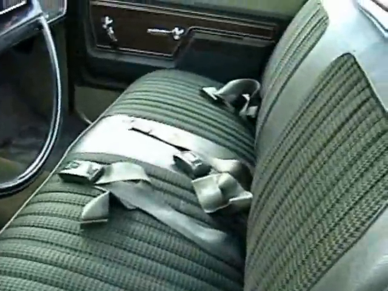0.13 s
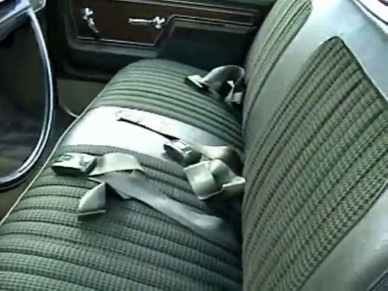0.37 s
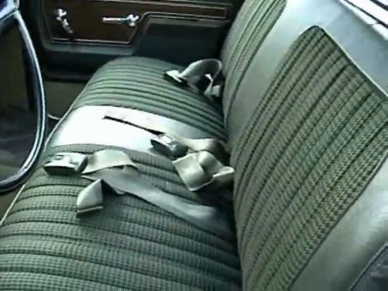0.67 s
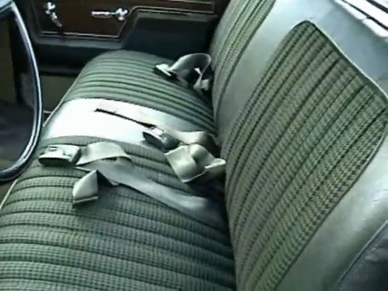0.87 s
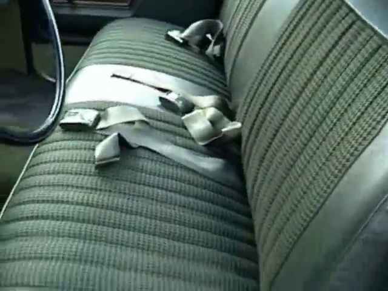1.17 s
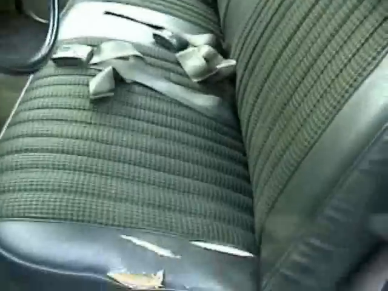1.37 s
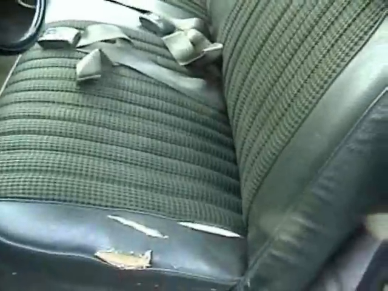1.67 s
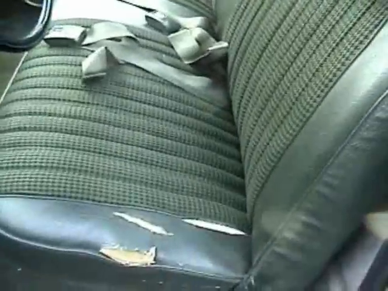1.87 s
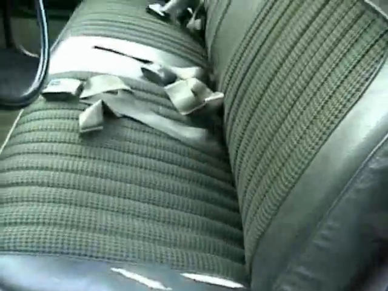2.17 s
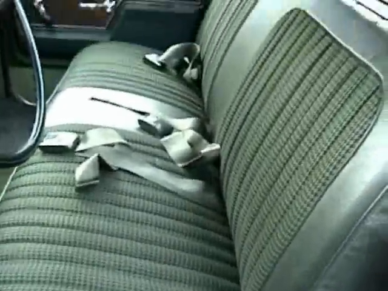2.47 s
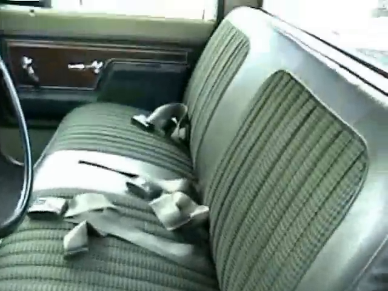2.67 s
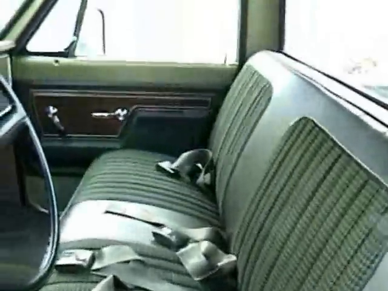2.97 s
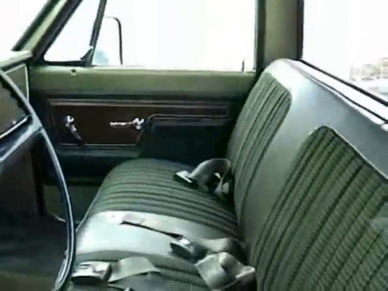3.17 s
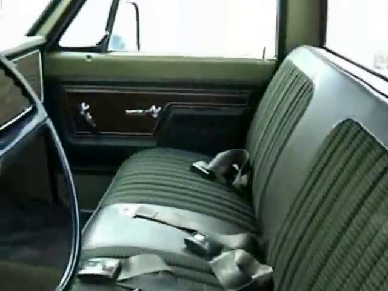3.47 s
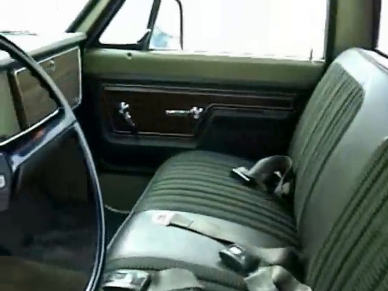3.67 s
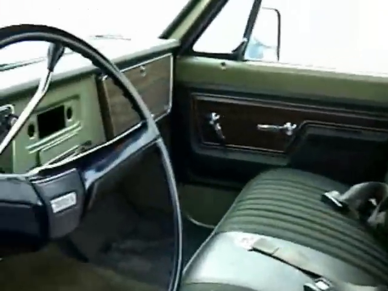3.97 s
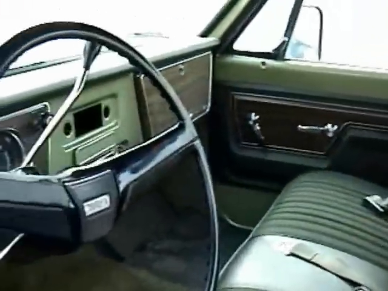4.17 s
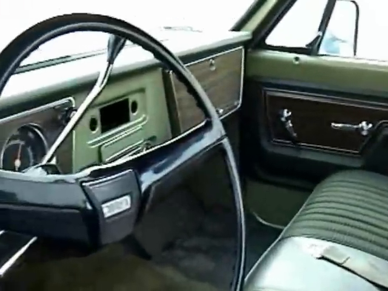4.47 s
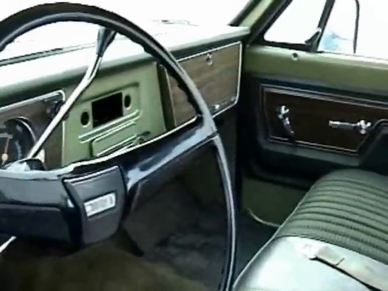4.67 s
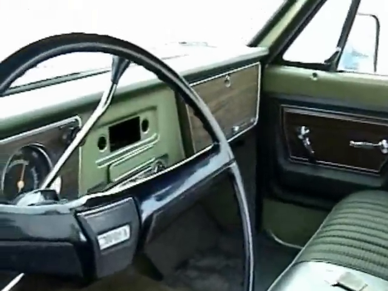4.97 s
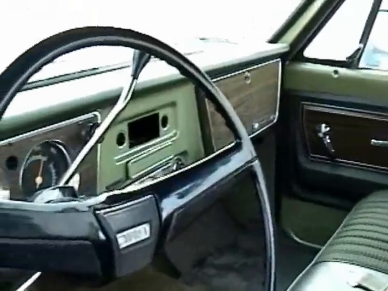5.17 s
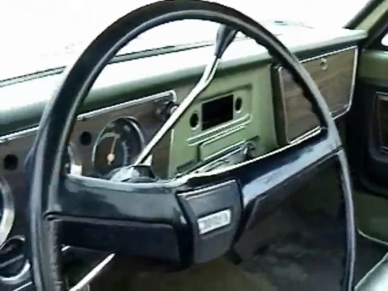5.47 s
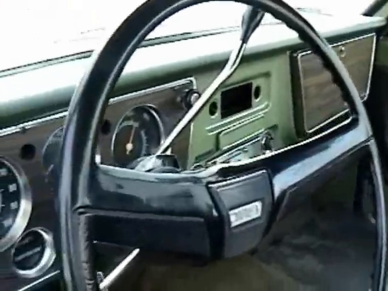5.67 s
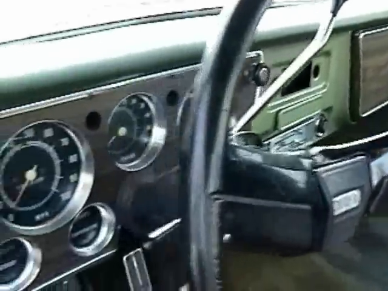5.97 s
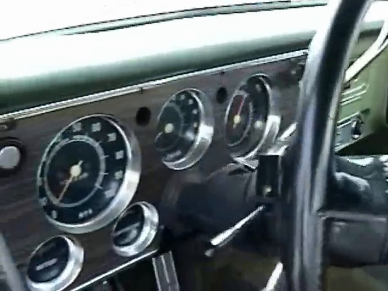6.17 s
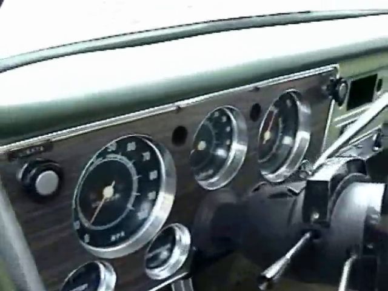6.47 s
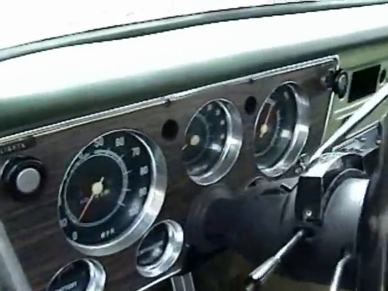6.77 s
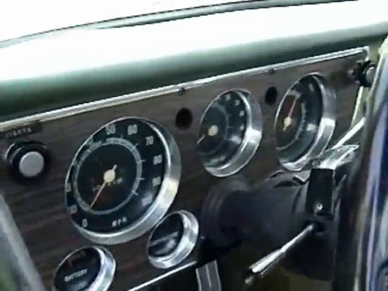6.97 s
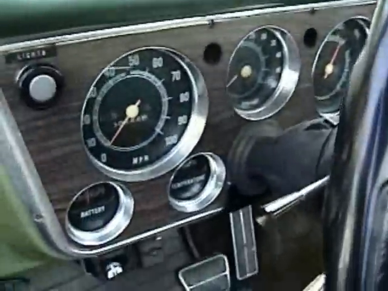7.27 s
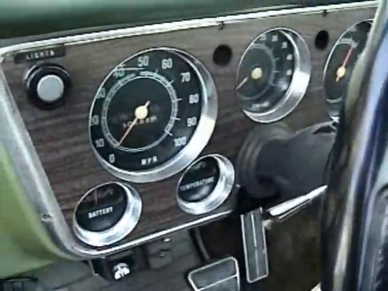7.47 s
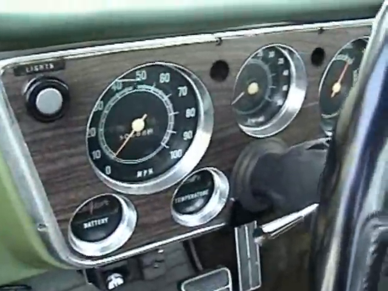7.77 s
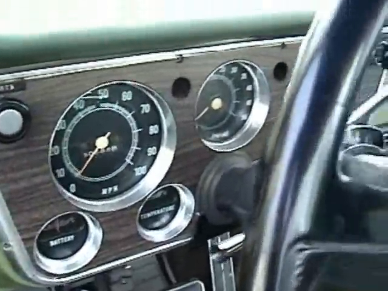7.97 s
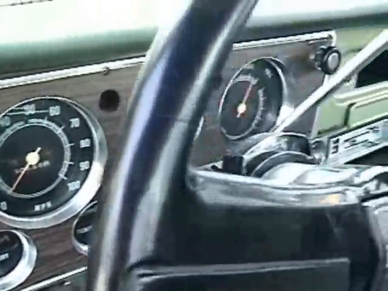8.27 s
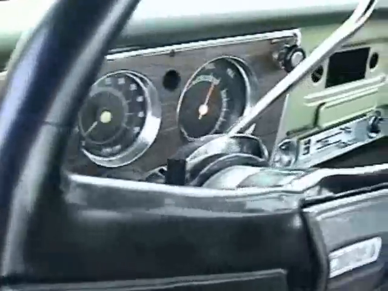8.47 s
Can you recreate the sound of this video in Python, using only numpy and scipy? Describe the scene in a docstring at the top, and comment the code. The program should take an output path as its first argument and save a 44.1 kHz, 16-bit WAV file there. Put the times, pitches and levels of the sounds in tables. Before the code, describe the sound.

Someone shifts about in an old truck cab, with scattered knocks, clicks and rubs, one sharp metallic latch snap midway, and a heavier thump later.

```python
"""Someone with a small camera leans in at the open door of a parked pickup and climbs into the cab.
Shaped noise makes faint outdoor air, rustle and rubs; wavering tones make the camera drive's whine.
Bumps, soft thumps and hollow knocks soon join: damped blows with ringing and a brief answer from the cab.
Latch clicks, bright ticks and a faint swish of fabric follow; far traffic swells early, the drive's whirr later.
The door latch snaps loudest just before four seconds; near the end a low drone comes in and grows."""
import sys
import numpy as np
from scipy import signal
from scipy.fft import rfft, irfft
from scipy.io import wavfile
from scipy.ndimage import uniform_filter1d

SR = 44100
rng = np.random.default_rng(int(sys.argv[2]) if len(sys.argv) > 2 else 0)


def output_pcm(signal):
    """Save a mono or channel-first signal as 16-bit PCM at the path in sys.argv[1].

    Samples are clipped to [-1, 1] before scaling.
    """
    pcm = np.clip(np.atleast_2d(signal).T, -1, 1) * 32767
    wavfile.write(sys.argv[1], SR, np.round(pcm).astype(np.int16))


N = 380128
TIME = np.arange(N) / SR
FREQS = np.fft.rfftfreq(4096, 1 / SR) + 1  # the 1 Hz shift keeps logarithms finite

# In every table of contacts, resonance is the main one of the spot that is hit; hardness adds treble.
# ringing of the door's metal: (frequency [Hz], relative level [dB], time to fade by 60 dB [s])
DOOR_RINGING = [(960, -17.5, .14), (1177, -7, 0.13), (1295, -2.5, 0.08), (1410, -1, .11), (1590, -1.5, .12),
                (1630, -6.5, .11), (1793, -9, 0.12), (1980, 0.5, 0.13), (2240, -13.5, .12),
                (2310, -11, .11), (2560, -13.5, .1), (2430, 4, .1), (2750, 11, 0.086)]
# ringing of hollow panels: (frequency [Hz], relative level [dB], time to fade by 60 dB [s])
PANEL_RINGING = [(175, -5, .1), (298, 16.5, 0.022), (450, -26, 0.048), (634, -11.5, 0.086),
                 (742, 1.5, 0.046), (870, 6, 0.033), (1250, -6.5, .06)]
# course of the rustle as the body moves, before overall trims:
# (time [s], middle band level [dB], hiss level [dB])
RUSTLE_LEVELS = [(0.0, -49.5, -56), (0.58, -50, -59.5), (0.81, -53, -61.5), (1.34, -50, -62.5),
                 (1.9, -54.5, -64.5), (2.98, -56, -66.5), (3.55, -52.5, -62), (3.79, -48.5, -61.5),
                 (3.96, -48.5, -59.5), (4.1, -54, -62.5), (4.37, -57, -65.5), (5.02, -54.5, -63),
                 (6.39, -56.5, -63.5), (6.53, -53.5, -61.5), (6.96, -52, -65), (7.42, -58, -65),
                 (8.04, -57.5, -65), (8.62, -52, -66.5)]


def undb(db):
    """Turn decibels into gain."""
    return 10 ** (np.asarray(db) / 20)


def unit(x):
    """Scale to an average strength (rms) of 1."""
    return x / np.sqrt(np.mean(x ** 2) + 1e-20)


def fade(t, t60):
    """Exponential decay that drops 60 dB in t60 seconds."""
    return np.exp(-np.log(1000) * t / t60)


def curve(rows, t, axis=1):
    """Read one column of a level curve at time t."""
    columns = np.transpose(rows)
    return np.interp(t, columns[0], columns[axis])


def swell(peak_s, width_s):
    """Gain of something that grows, peaks and fades."""
    return 1 / (1 + ((TIME - peak_s) / width_s) ** 2)


def walk(rate):
    """Smooth chance: straight lines between random values, rate per second, spread near 1."""
    k = int(SR / rate)
    steps = np.repeat(rng.standard_normal(N // k + 1), k)
    return 1.158 * uniform_filter1d(steps, k)[:N]


def add(out, s, x):
    """Mix a stereo sound in at time s."""
    start = max(0, int(s * SR))
    out[:, start:start + x.shape[1]] += x[:, :N - start]


def place(x, pan_db, lag_s=0):
    """Lean a stereo sound to one side (positive is left); the left port hears it lag_s later."""
    samples = np.arange(x.shape[1])
    left = np.interp(samples - lag_s * SR, samples, x[0], left=0)
    return np.array([left, x[1]]) * unit(undb([[pan_db / 2], [-pan_db / 2]]))


def pair(count, likeness):
    """Left and right noise with a given correlation, at most 0.99."""
    mid, side = rng.standard_normal((2, count))
    c = np.clip(likeness, 0, .99)
    return np.sqrt((1 + c) / 2) * mid + np.sqrt((1 - c) / 2) * np.array([side, -side])


def hump(f, hz, octaves):
    """Power of a broad resonance."""
    return np.exp(-.5 * (np.log2(f / hz) / octaves) ** 2)


def response(power):
    """Impulse response with this power spectrum, starting at once (minimum phase), with energy 1."""
    cepstrum = irfft(np.log(power / power.max() + 1e-7) / 2)
    # fold the mirrored half forward so that nothing sounds before the impulse
    cepstrum[1:len(power) - 1] *= 2
    cepstrum[len(power):] = 0
    h = irfft(np.exp(rfft(cepstrum)))[:len(power)]
    return h / np.linalg.norm(h)


def through(x, h):
    """Filter both channels."""
    return signal.fftconvolve(x, h[None], axes=1)


def band(hz, octaves, likeness):
    """Narrow stereo noise, rms 1."""
    noise = through(pair(N, likeness), response(hump(FREQS, hz, octaves)))
    return unit(noise[:, :N])


def tone(hz, waver_hz, waver_db):
    """A single tone that wavers slightly in pitch and level."""
    phase = 2 * np.pi * np.cumsum(hz + waver_hz * walk(14)) / SR
    return np.sqrt(2) * np.sin(phase) * undb(waver_db * walk(5.7))


def colour(hz, hard_db, thud_db, clack_db, tick_db):
    """A contact's damped main resonance and thud, with a clack and tick that grow with hardness."""
    # peaks and dips of the cab and camera housing: (frequency [Hz], width [Hz], level [dB])
    housing = [(322, 11, 9.5), (473, 22, 3.5), (598, 82, 6), (800, 150, -4), (940, 40, 2.5), (1243, 120, 3),
               (1408, 36, -7), (1600, 95, 2), (1860, 140, 4), (2180, 550, -1), (2640, 520, -1.5),
               (3530, 280, -1)]
    thud = undb(thud_db) ** 2 * hump(FREQS, 573, 0.75)
    clack = undb(clack_db + hard_db) ** 2 * hump(FREQS, 2400, .23)
    tick = undb(tick_db + hard_db) ** 2 * hump(FREQS, 4190, 0.5)
    housing_db = sum(db / (1 + (2 * (FREQS - f) / width) ** 2) for f, width, db in housing)
    return response((hump(FREQS, hz, 0.29) + thud + clack + tick) * undb(housing_db) ** 2)


def blows(table, modes, thud_db, clack_db, tick_db, ring_db, scatter_db, scatter_t60, cab_db, cab_t60,
          rebound_s, rebound, likeness, lag_s, arrive_s):
    """Each blow is a push and a rebound, with near reflections, ringing modes and the cab's short tail."""
    out, t = np.zeros((2, N)), np.arange(int(.3 * SR)) / SR
    for s, db, hz, hard_db, pan_db in table:
        h = colour(hz, hard_db, thud_db, clack_db, tick_db)
        push = np.zeros((2, len(t)))
        push[:, 0] = 1
        # a sound from the side reaches the far port by a longer way round
        delays = (rebound_s * rng.uniform(0.78, 1.4) + np.array([lag_s, 0])) * SR
        push[[0, 1], delays.astype(int)] += rebound
        ring = np.zeros((2, len(t)))
        for f, mode_db, t60 in modes:
            detune = 1 + .005 * rng.standard_normal()
            phase = 0.5 * rng.standard_normal((2, 1))
            ring += undb(mode_db) * fade(t, t60) * np.sin(2 * np.pi * f * detune * t + phase)
        arrive = 1 - np.exp(-(t / arrive_s) ** 2)  # reflections need a moment to come back
        scatter = pair(len(t), likeness) * arrive * fade(t, scatter_t60)
        cab = pair(len(t), likeness / 2) * arrive * fade(t, cab_t60)
        parts = (push, 0), (ring, ring_db), (scatter, scatter_db), (cab, cab_db)
        hit = sum(undb(part_db) * unit(through(part, h)) for part, part_db in parts)
        hit /= np.sqrt(np.mean(hit[:, :SR // 100] ** 2))  # the first 10 ms set the level
        add(out, s, undb(db) * place(hit, pan_db, lag_s))
    return out


def air(body_db, hiss_db, low_db, flicker_db):
    """Outdoor rumble, a wavering middle band of air and rustle, and smooth hiss."""
    # tone of the air within each band: (frequency [Hz], relative level per Hz [dB])
    air_shape = [(15, -55), (25, -13), (54, -8), (81, -3.5), (114, -8), (179, -5.5), (257, -8), (378, -11),
                 (447, -8.5), (964, -11.5), (1800, -17), (2240, -20), (3060, -16.5), (6590, -17.5),
                 (7800, -25), (10100, -86.5), (17200, -120)]
    # how alike left and right are: (frequency [Hz], correlation [0 to 1])
    air_match = [(30, .4), (80, 0.84), (200, 0.57), (600, 0.31), (1500, 0.069), (3000, 0.061),
                 (7000, 0.052)]
    # course of the outdoor rumble, before low_db: (time [s], level [dB])
    rumble_levels = [(0.0, -57), (1.3, -62.5), (5.93, -63.5), (6.24, -66), (8.62, -65.5)]
    f = np.fft.rfftfreq(N, 1 / SR) + 1

    def over_pitch(rows):
        hz, values = np.transpose(rows)
        return np.interp(np.log(f), np.log(hz), values)

    c = np.clip(over_pitch(air_match), 0, 1)
    mid, side = rfft(rng.standard_normal((2, N))) * undb(over_pitch(air_shape))
    both = mid + np.sqrt((1 - c) / (1 + c)) * np.array([side, -side])
    low = 1 / (1 + (f / 190) ** 6)
    high = 1 / (1 + (2900 / f) ** 6)
    rumble, body, hiss = (unit(irfft(both * part, N)) for part in (low, 1 - low - high, high))
    rumble *= undb(low_db + curve(rumble_levels, TIME) + 1.2 * walk(5))
    body *= undb(body_db + curve(RUSTLE_LEVELS, TIME) + flicker_db * walk(45))
    hiss *= undb(hiss_db + curve(RUSTLE_LEVELS, TIME, axis=2))
    return rumble + body + hiss


def drive_whine(trim_db):
    """Thin whine of the camera's drive: lines that waver separately left and right."""
    # lines of the whine: (frequency [Hz], level before trim_db [dB])
    lines = [(2370, -78.5), (2529, -78), (2686, -78), (3160, -79), (3494, -79), (3634, -82), (3765, -80),
             (6186, -89.5), (6374, -86)]
    return sum(undb(db + trim_db) * np.array([tone(hz, 3, 1.6), tone(hz, 3, 1.6)]) for hz, db in lines)


def low_hum(level_db):
    """A low, slightly unsteady hum, the same on both sides."""
    return undb(level_db) * tone(87, 2.86, 0.9)


def far_traffic(peak_s, width_s, peak_db):
    """Far traffic: a narrow low band of noise that swells and fades."""
    return band(262, 0.072, likeness=1.0) * undb(peak_db) * swell(peak_s, width_s)


def drive_whirr(peak_s, width_s, peak_db):
    """Whirr of the camera's drive: a very narrow high band of noise that swells and fades."""
    return band(2692, 0.0086, likeness=0.5) * undb(peak_db) * swell(peak_s, width_s)


def scuffs(thud_db, clack_db, tick_db, slips_per_s, spread_db, smooth_db, edge, likeness):
    """Rubbing cloth and hands: dense tiny uneven slips excite the same kind of resonances as a blow."""
    # rubs: (time [s], length [s], level [dB], resonance [Hz], hardness [dB], left minus right [dB])
    rubs = [(0.005, 0.084, -43, 900, 4, 2), (0.392, 0.055, -43, 774, 0.5, -3),
            (0.411, 0.034, -39.5, 660, -18, 1), (0.452, 0.056, -47, 680, -4, 0),
            (0.569, 0.14, -49, 1060, 3, .5), (3.516, 0.054, -55, 420, 10, 3),
            (1.272, 0.05, -52.5, 990, 5.5, -1), (3.612, 0.08, -48.5, 1210, 2, -1),
            (3.712, 0.05, -45, 1100, 0, -1), (4.003, 0.054, -48.5, 950, -4, -1),
            (4.094, 0.024, -37.5, 960, -0.5, 5), (4.686, 0.07, -57.5, 5440, 12, 4),
            (4.946, 0.026, -46, 950, 2.5, -6), (5.098, 0.073, -45.5, 1030, -6.5, -4),
            (5.974, 0.047, -53.5, 1320, 1, -2), (6.379, 0.18, -44, 910, -4, 0),
            (6.502, 0.07, -45, 950, -6, -1), (6.631, 0.044, -47, 910, -5, 1),
            (6.89, 0.041, -44, 885, 3, 0.5), (6.932, 0.095, -48, 1160, -3, -2),
            (7.086, 0.11, -51, 1200, -3, -2), (8.2, 0.2, -58.5, 800, -4, 0)]
    out = np.zeros((2, N))
    for s, length, db, hz, hard_db, pan_db in rubs:
        count = int(length * SR)
        sizes = undb(spread_db * np.minimum(rng.exponential(size=count), 3))
        slips = (rng.random(count) < slips_per_s / SR) * sizes
        # each slip dies away with a time constant of 1.4 ms
        grip = signal.lfilter([1], [1, -np.exp(-1 / (0.0014 * SR))], slips)
        strength = (unit(grip) + undb(smooth_db)) * signal.windows.tukey(count, edge)
        rub = pair(count, likeness) * strength
        sound = through(rub, colour(hz, hard_db, thud_db, clack_db, tick_db))
        sound /= np.sqrt(np.mean(sound[:, :count] ** 2))
        add(out, s, undb(db) * place(sound, pan_db))
    return out


def trim_bumps():
    """Duller bumps against trim: blows with weak treble, strong near reflections and ringing panels."""
    # bumps: (time [s], level [dB], resonance [Hz], hardness [dB], left minus right [dB])
    rows = [(0.0269, -36.5, 1010, -1, -6), (0.053, -45, 1000, 16, -6), (0.0956, -42.5, 1070, 8, -5),
            (0.415, -36, 660, -14, 0), (0.4255, -34.5, 640, -13, 0), (0.6401, -45, 1100, -4, -3),
            (4.0956, -32, 900, 6.5, 1), (6.4496, -29.5, 900, -2, 0), (6.4646, -40, 970, -8, -2),
            (6.4952, -26, 770, -4.5, 0.5), (6.5219, -43, 1120, 7, -7), (6.5703, -43.5, 1040, -8, 0),
            (6.6102, -43, 1080, 6, -2), (6.6523, -36, 1020, 3.5, 0), (6.9366, -46, 1220, 10, -2),
            (6.9477, -41.5, 1164, 5, 1), (6.9861, -35.5, 1090, 5, -2.5), (7.0977, -42.5, 1000, -3, -5),
            (7.131, -52, 1300, 12, -3), (7.8177, -44.5, 850, 0, 0)]
    return blows(rows, PANEL_RINGING, thud_db=-7.5, clack_db=-18.5, tick_db=-34.5,
                 ring_db=-15, scatter_db=-0.5, scatter_t60=0.023, cab_db=-10, cab_t60=.16,
                 rebound_s=0.0025, rebound=0.28, likeness=0.81, lag_s=0, arrive_s=0.0022)


def thumps(octaves):
    """Weight settling on seat and floor: soft heavy contacts stir only low resonances of the cab."""
    # thumps: (time [s], level [dB], centre [Hz], time to fade by 60 dB [s])
    rows = [(0.338, -37.5, 298, 0.054), (3.279, -41.5, 227, 0.05), (3.523, -45.5, 390, 0.13),
            (3.681, -41.5, 320, 0.12), (3.706, -49.5, 109, 0.22), (3.883, -48, 102, 0.23),
            (5.124, -48, 129, 0.39), (5.165, -49.5, 241, 0.35), (5.7, -44.5, 150, 0.22),
            (5.701, -54, 380, 0.11), (6.41, -44, 430, 0.08), (6.495, -35, 440, 0.055),
            (6.986, -43, 380, .06)]
    out, t = np.zeros((2, N)), np.arange(int(.4 * SR)) / SR
    for s, db, hz, t60 in rows:
        boom = through(pair(len(t), 0.82) * fade(t, t60), response(hump(FREQS, hz, octaves)))
        boom /= np.sqrt(np.mean(boom[:, :SR // 50] ** 2))  # the first 20 ms set the level
        add(out, s, undb(db) * boom)
    return out


def side_knocks():
    """Hollow knocks from the right: blows that ring the panels and reach the left port later."""
    # knocks: (time [s], level [dB], resonance [Hz], hardness [dB], left minus right [dB])
    rows = [(0.3392, -23.5, 816, 6.5, -1), (1.5866, -37.5, 674, -6, 2), (2.6333, -36.5, 796, 1.5, 3),
            (2.8427, -30.5, 774, -0.5, -3), (2.901, -36.5, 674, -9, 1.5), (3.0592, -41, 830, -1, 11),
            (3.0817, -27.5, 756, -9, -1), (3.1988, -44.5, 880, -1, -2), (3.2351, -43, 790, -7, -1),
            (3.2789, -29.5, 774, -0.5, 2), (3.2895, -39, 657, -6, 9), (3.3026, -30, 730, -3, -6.5)]
    return blows(rows, PANEL_RINGING, thud_db=-9.5, clack_db=-18.5, tick_db=-31,
                 ring_db=-9, scatter_db=-3.5, scatter_t60=0.017, cab_db=-15, cab_t60=0.19,
                 rebound_s=0.001815, rebound=.3, likeness=0.037, lag_s=.00028, arrive_s=.002)


def stray_clicks(count, above_db, spread_db, hz, hard_db):
    """Rows of faint chance clicks, more frequent and stronger while the rustle is louder."""
    when, size, pitch, side = rng.random((count, 4)).T
    activity = np.cumsum(undb(curve(RUSTLE_LEVELS, TIME)))
    times = np.interp(when, activity / activity[-1], TIME)
    levels = curve(RUSTLE_LEVELS, times) + above_db + spread_db * (size - .5)
    return [(s, db, hz * 2 ** (p - .5), hard_db, -6 * x)
            for s, db, p, x in zip(times, levels, pitch, side)]


def latch_clicks():
    """The latch, small hard parts and stray clicks: blows that ring the door's metal."""
    # clicks: (time [s], level [dB], resonance [Hz], hardness [dB], left minus right [dB])
    rows = [(0.5186, -41.5, 900, -9, -5), (0.8428, -46, 930, -12, 1), (1.1697, -43, 1100, -1, -1),
            (1.5837, -30.5, 1410, 7.5, -10), (2.4213, -41.5, 1170, -10, -5),
            (3.7055, -28.5, 1220, 8.5, -4.5), (3.7367, -34.5, 970, 2, -3), (3.7548, -37, 990, -2, -3.5),
            (3.767, -32, 1260, 11.5, -2.5), (3.8829, -16.5, 1250, 1, -2.5), (3.8945, -35.5, 1450, 10, -3),
            (3.9035, -38.5, 1520, 0, -2), (4.3287, -46.5, 1210, -18, -4), (4.5547, -27, 1220, 3.5, -2.5),
            (4.6056, -45.5, 1340, 10, -2), (5.4124, -52.5, 1010, -12, -4), (6.821, -44.5, 1300, 7.5, 1),
            (7.0371, -46, 1360, 9, -9)]
    strays = stray_clicks(count=14, above_db=-0.5, spread_db=10, hz=1210, hard_db=0.5)
    return blows(list(rows) + strays, DOOR_RINGING, thud_db=-14.5, clack_db=-14.5, tick_db=-39.5,
                 ring_db=-11.5, scatter_db=-9, scatter_t60=0.013, cab_db=-12, cab_t60=0.15,
                 rebound_s=.0029, rebound=.28, likeness=.85, lag_s=0, arrive_s=0.002)


def ticks_and_swish():
    """Bright ticks of small hard parts, and a faint high swish of fabric near 2.1 s, all made as blows."""
    # ticks and swish: (time [s], level [dB], resonance [Hz], hardness [dB], left minus right [dB])
    rows = [(1.5862, -45, 2980, -10, 3), (2.083, -60, 5600, 0, 2), (2.0925, -58, 5000, 4, 0),
            (2.9463, -46, 3100, -8, -9), (4.759, -51.5, 4200, 7, 5), (4.7942, -47.5, 3560, 15, 2),
            (7.9038, -43.5, 2550, -20, -1.5)]
    return blows(rows, DOOR_RINGING, thud_db=-8.5, clack_db=-3, tick_db=0.5,
                 ring_db=-16.5, scatter_db=-9.5, scatter_t60=0.016, cab_db=-4, cab_t60=0.12,
                 rebound_s=0.0021, rebound=0.3, likeness=0.35, lag_s=0, arrive_s=0.0018)


def late_drone(start_s, attack_s, start_db, rise_db_per_s):
    """A low drone that comes in late and grows steadily."""
    age = np.maximum(TIME - start_s, 0)
    onset = np.minimum(age / attack_s, 1)
    return tone(177.3, 0.85, 0.69) * onset * undb(start_db + rise_db_per_s * age)


def scene():
    """All contacts over the quiet background."""
    background = air(body_db=2.0, hiss_db=-1.5, low_db=1.5, flicker_db=2.25)
    background += drive_whine(trim_db=3.5) + low_hum(level_db=-67)
    background += far_traffic(peak_s=1.48, width_s=.9, peak_db=-58.5)
    background += drive_whirr(peak_s=3.3, width_s=2.6, peak_db=-68.5)
    background += late_drone(start_s=7.37, attack_s=0.21, start_db=-65.5, rise_db_per_s=4)
    rubbing = scuffs(thud_db=-5, clack_db=-17, tick_db=-21.5, slips_per_s=450, spread_db=4.5,
                     smooth_db=-6, edge=0.27, likeness=0.92)
    soft_contacts = rubbing + trim_bumps() + thumps(octaves=0.57)
    hard_contacts = side_knocks() + latch_clicks() + ticks_and_swish()
    return background + soft_contacts + hard_contacts


def record(dry):
    """The camera's narrow band: a steep low-pass leaves almost nothing above its top frequency."""
    top_hz = 7900
    low_pass = signal.ellip(10, .2, 60, top_hz, fs=SR, output="sos")  # ripple 0.2 dB, stop 60 dB
    return signal.sosfilt(low_pass, dry)


dry = scene()
out = record(dry)
output_pcm(out)
```